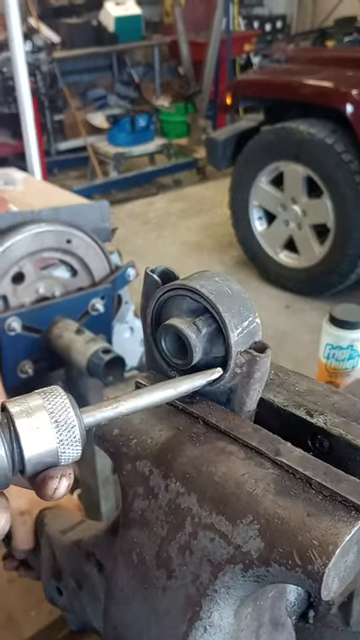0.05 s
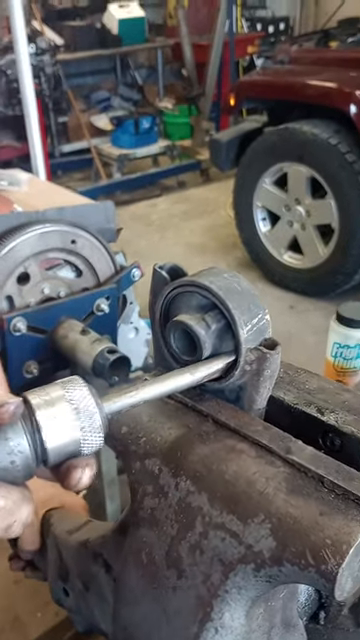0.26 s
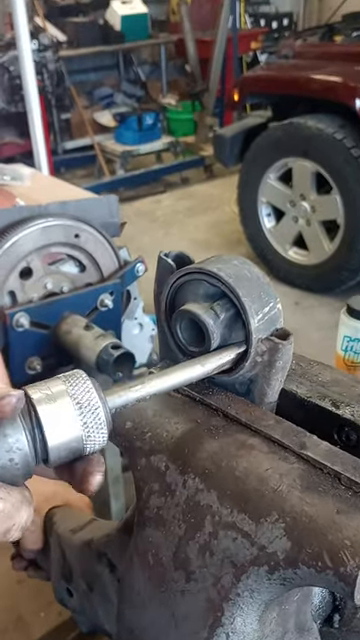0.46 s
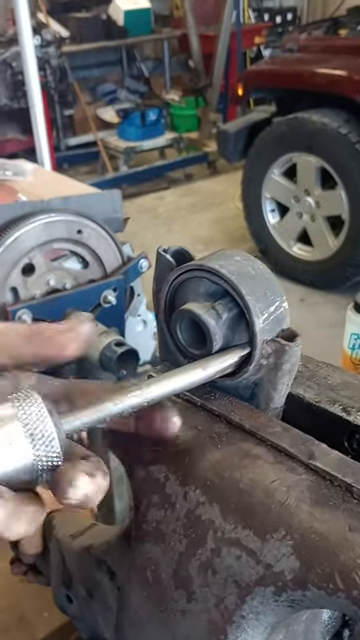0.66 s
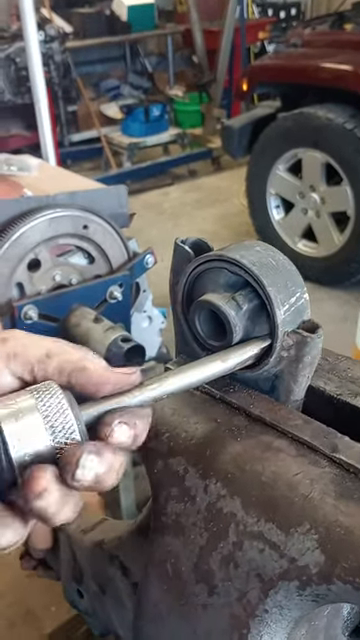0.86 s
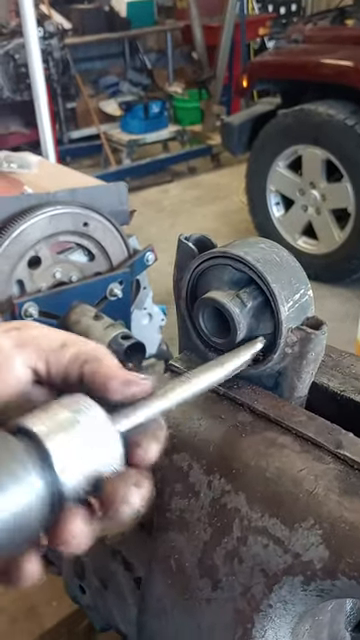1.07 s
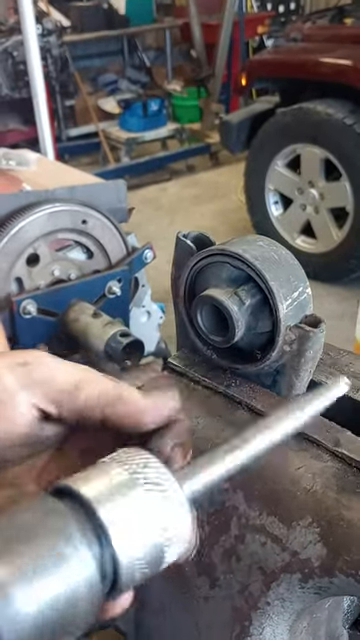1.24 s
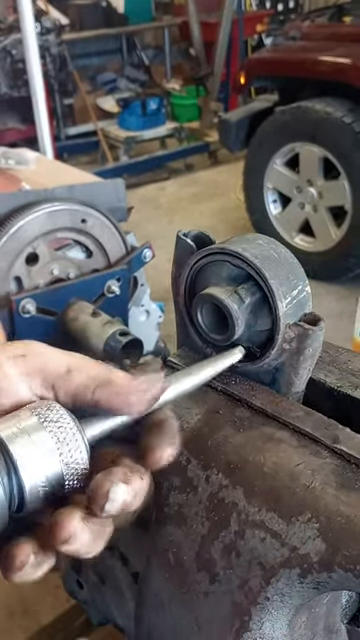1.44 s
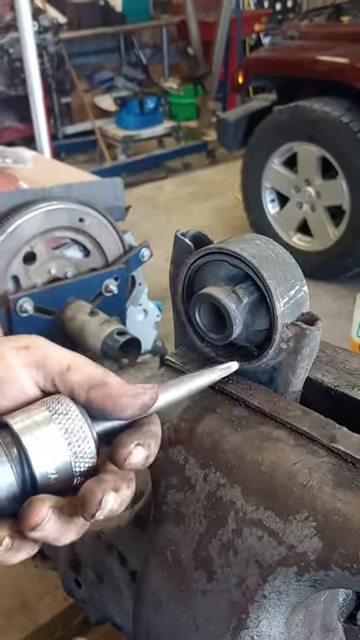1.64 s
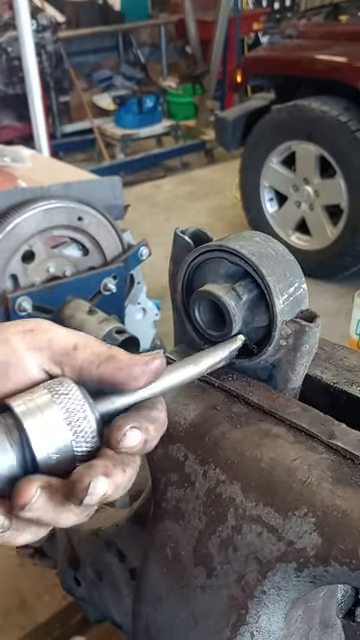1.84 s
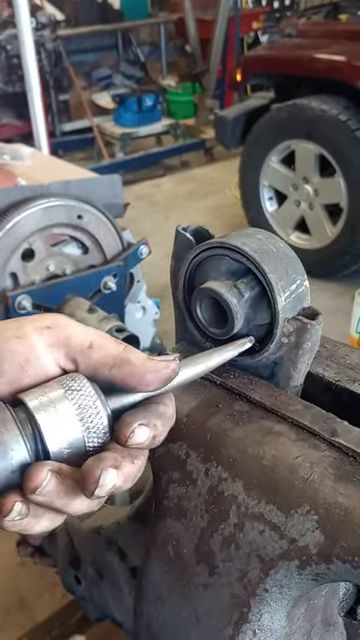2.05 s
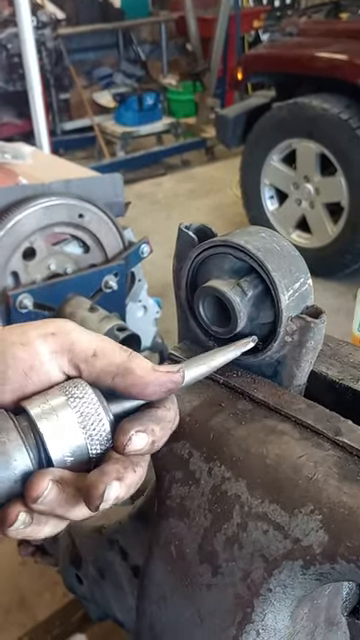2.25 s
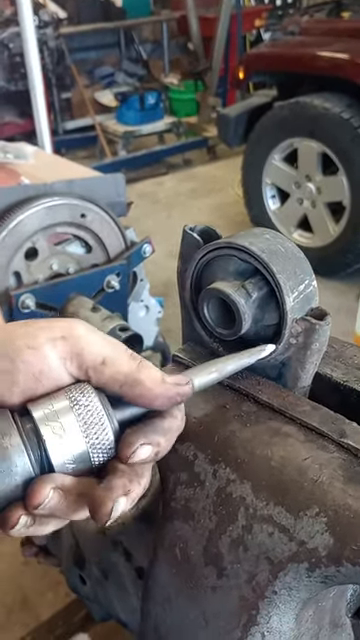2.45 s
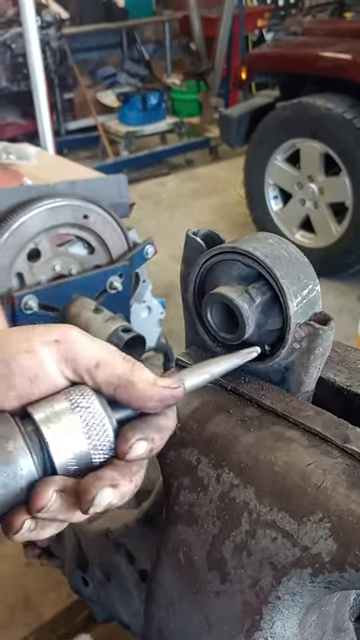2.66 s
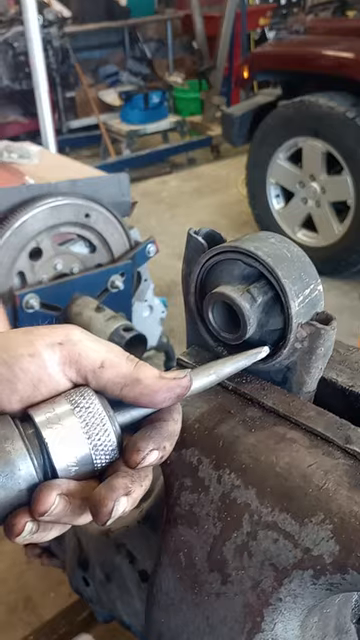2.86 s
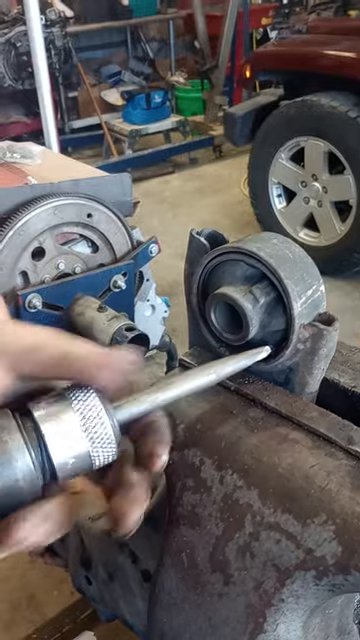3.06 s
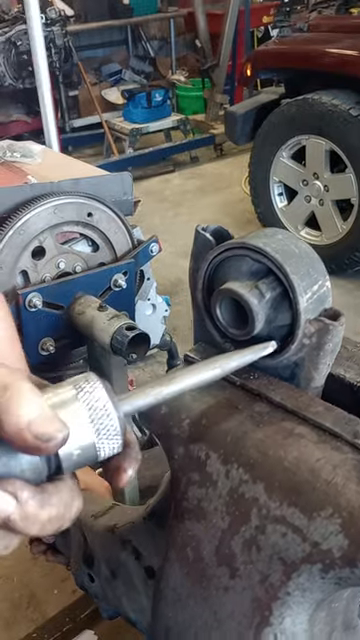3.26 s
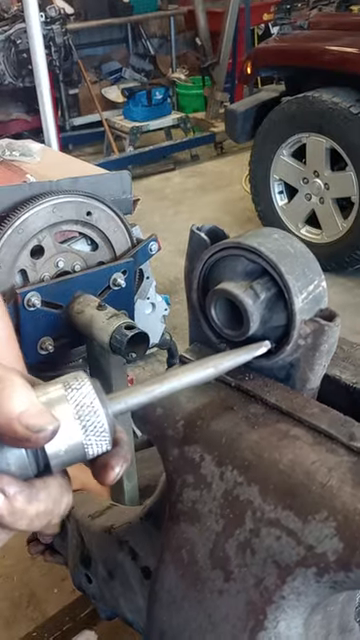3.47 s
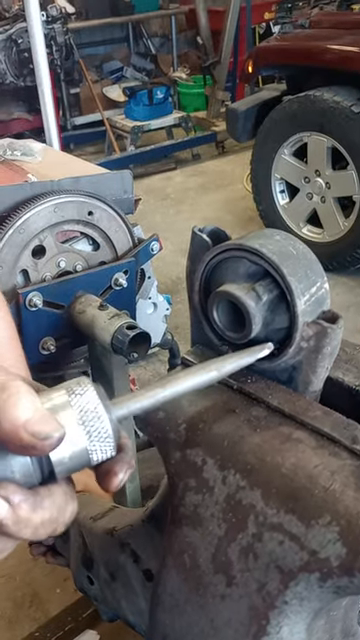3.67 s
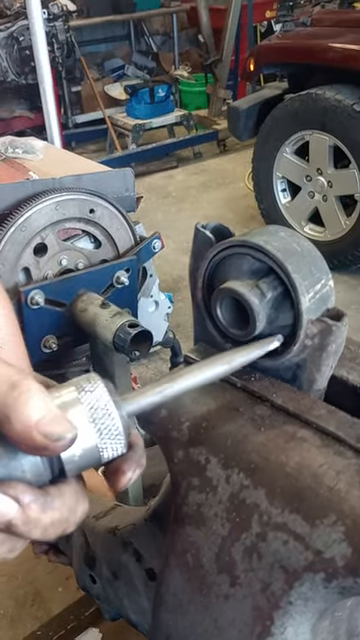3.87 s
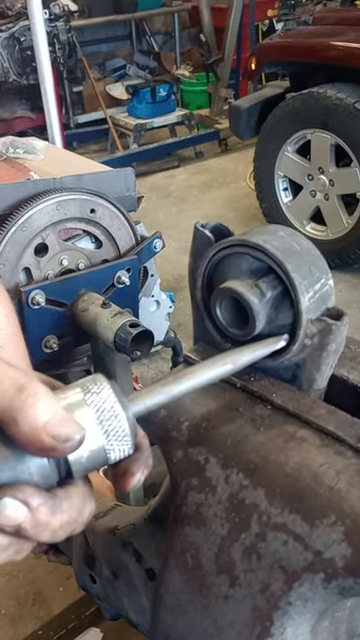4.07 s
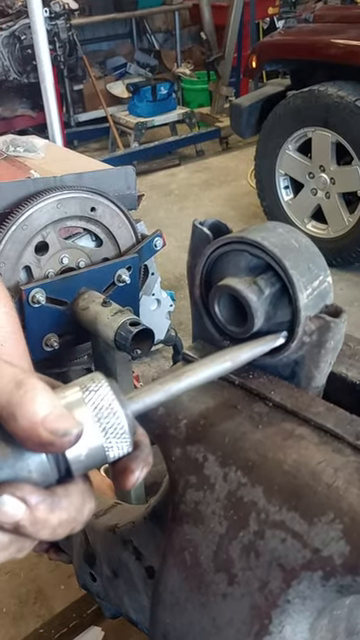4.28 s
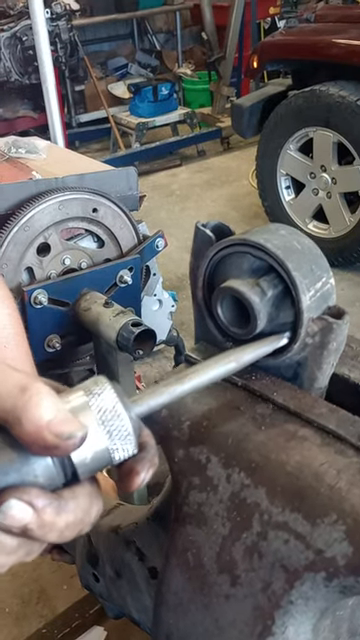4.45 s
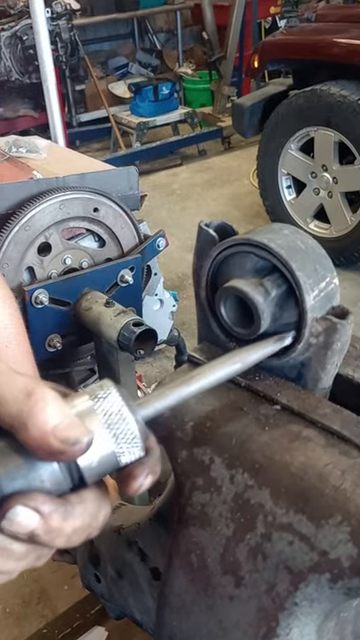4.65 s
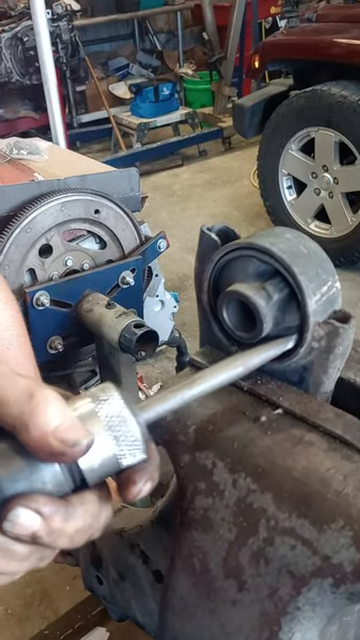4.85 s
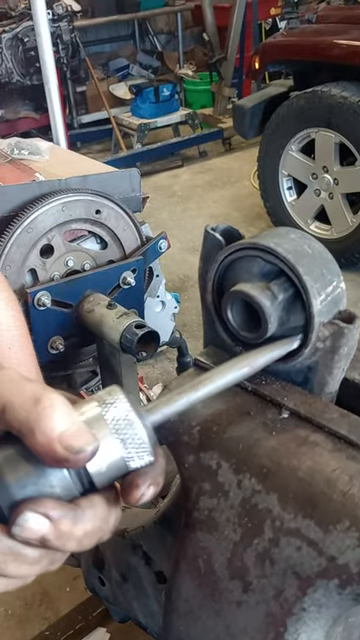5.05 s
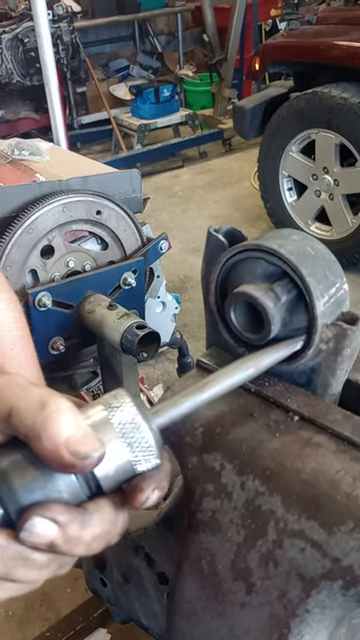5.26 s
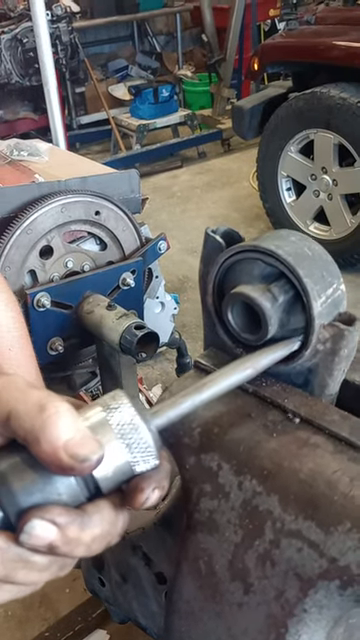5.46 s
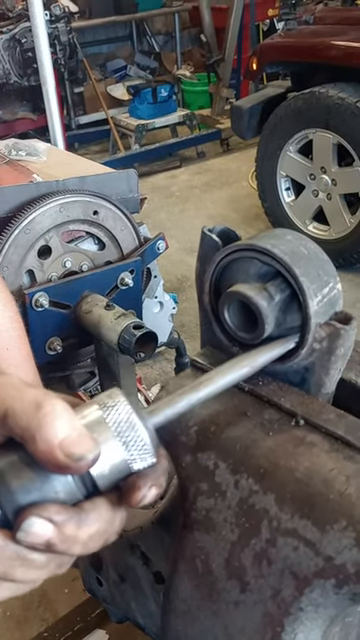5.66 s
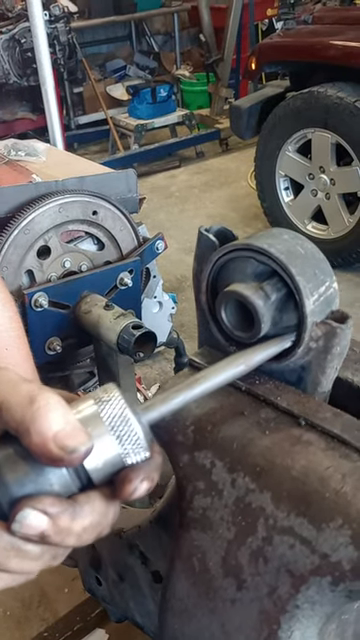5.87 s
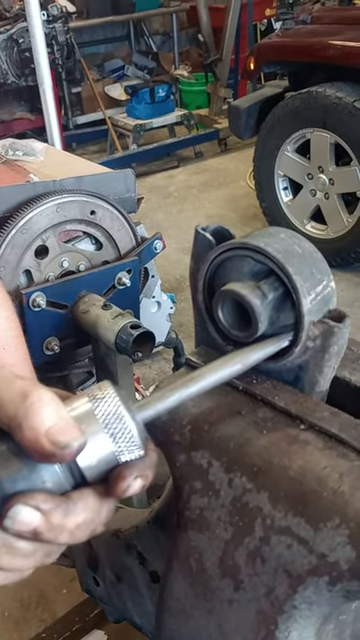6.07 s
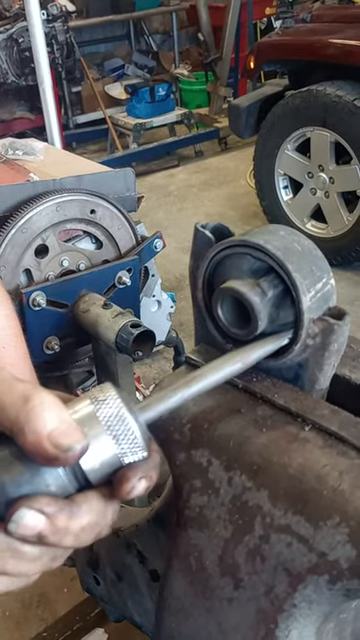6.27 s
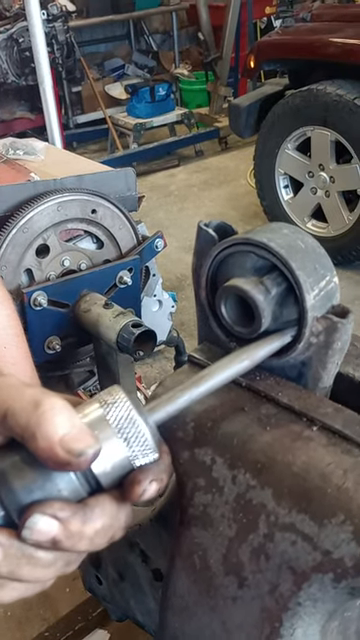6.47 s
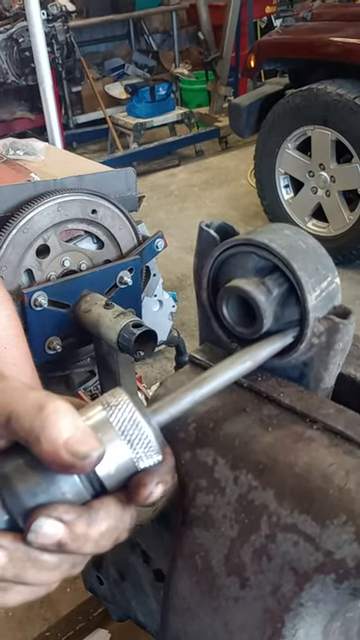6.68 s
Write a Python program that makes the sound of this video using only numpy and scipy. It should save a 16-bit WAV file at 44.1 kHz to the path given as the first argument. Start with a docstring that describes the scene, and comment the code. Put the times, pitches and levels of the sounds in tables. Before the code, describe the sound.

A quiet garage with low mains hum and soft room air, heard close by a small, bass-thin microphone. At about 0.15 s a tiny moan and two idle ticks lead into an air hammer's burst: uneven, loud exhaust pops, crackling rattle and steel clang, ending near 0.5 s in fading hiss and short echoes. From 0.75 to 2.7 s only faint metallic bit clicks break the hum, the clearest near 1.2 s, with a little cluster around 2.5 s. At 3.3 s a soft low knock and fluttering rising moan start; idle pops and ticks follow from 3.55 s, then faltering blows gather into a brief fast run at 3.9 s. After two stray strokes, steady hammering begins at 4.2 s, about forty strokes a second, bright and clanging. From 4.7 s it turns weaker, damped and buzzing, with hiss, swelling low drone and gliding metallic squeals until the end at 6.7 s.

```python
"""Air hammer on a steel sleeve

An air hammer chisels at a steel-sleeved bushing in a vise: a short burst, a pause with the tool clicking
in the hand, then a faltering start and a steady run of about forty strokes a second.
Each stroke is an exhaust pop with rings, plus crackling noise sent through resonances of sleeve and bit.
Shaped noise makes a hiss with a metallic hum under and after the strokes. The wedged bit sings in
gliding resonances, and the garage hums and echoes.
"""
import sys
import numpy as np
from scipy import signal
from scipy.fft import rfft, irfft
from scipy.io import wavfile
from scipy.ndimage import uniform_filter1d

SR = 44100
rng = np.random.default_rng(int(sys.argv[2]) if len(sys.argv) > 2 else 0)


def output_pcm(signal):
    """Save a mono or channel-first signal as 16-bit PCM at the path in sys.argv[1].

    Samples are clipped to [-1, 1] before scaling.
    """
    pcm = np.clip(np.atleast_2d(signal).T, -1, 1) * 32767
    wavfile.write(sys.argv[1], SR, np.round(pcm).astype(np.int16))


N = 296352  # length in samples
T = np.arange(N) / SR  # time in seconds


def gain_of(db):
    """Turns decibels into an amplitude factor."""
    return 10 ** (np.asarray(db) / 20)


def evened(x):
    """Scales a signal to an rms of 1."""
    return x / np.sqrt(np.mean(x ** 2) + 1e-20)


def read(points, hz):
    """Reads a curve of (pitch, value) points, with straight lines over log pitch."""
    point_hz, value = np.transpose(points)
    return np.interp(np.log(hz + 1), np.log(point_hz + 1), value)


def add(mix, start_s, sound):
    """Adds a sound to the mix from a start time, cut at the end of the mix."""
    part = mix[..., round(start_s * SR):][..., :sound.shape[-1]]
    part += sound[..., :part.shape[-1]]


def coloured(x, points, sides=(1, 1)):
    """Applies a dB curve over pitch to both channels, multiplied by each channel's side factor."""
    hz = np.fft.rfftfreq(N, 1 / SR)
    gain = gain_of(np.outer(sides, read(points, hz)))
    return irfft(rfft(x) * gain, N)


def resonate(x, hz, width_hz):
    """A two-pole resonance; white noise of rms 1 stays at rms 1."""
    r = np.exp(-np.pi * width_hz / SR)
    forward = np.sqrt((1 - r ** 2) / 2) * np.array([1, 0, -1])
    feedback = [1, -2 * r * np.cos(2 * np.pi * hz / SR), r ** 2]
    return signal.lfilter(forward, feedback, x)


def glide(x, hz, width_hz):
    """A resonance that follows the pitch curve hz; white noise of rms 1 stays at rms 1."""
    turn = np.exp(2j * np.pi * np.cumsum(hz) / SR)
    r = np.exp(-np.pi * width_hz / SR)
    # shift the pitch down to zero, smooth there, then shift back up
    smooth = signal.lfilter([1], [1, -r], x / turn)
    return np.sqrt(2 * (1 - r ** 2)) * (turn * smooth).real


def ring(hz, t60, rise=0.00021):
    """A struck tone: a sine with a quick rise that fades by 60 dB in t60 seconds."""
    t = np.arange(round(t60 * SR)) / SR
    return np.sin(2 * np.pi * hz * t) * gain_of(-60 * t / t60) * (1 - np.exp(-t / rise))


def noise(same, size=N, late=0):
    """Left and right noise that share a part; the right may get it some samples late."""
    a, b = rng.standard_normal((2, size))
    right = same * np.roll(a, late) + np.sqrt(1 - np.clip(same, 0, 1) ** 2) * b
    return np.array([a, right])


# Hum tones: pitch_hz, level_db (the first, steady tone gets 4 dB more)
HUM_TONES = [(118.4, -62), (220.7, -61), (242.2, -63), (382.2, -69.5)]
# Tone colour of the room air: pitch_hz, relative_level_db
AIR_COLOUR = [(24, -55), (40, -21), (106, -3.5), (171, -10), (237, -22), (290, -7.5), (715, -7),
              (1090, -8.5), (1720, -5.5), (5870, -18), (8130, -30), (14800, -30), (16000, -25)]
# How alike left and right are in the room air: pitch_hz, likeness (-1 to 1)
AIR_LIKENESS = [(60, 0.94), (130, 0.65), (290, 0.4), (640, 0.18), (1410, 0.038), (3100, -0.27),
                (6820, 0.25), (15000, -0.19)]


def background():
    """Room noise with slight random patches of level, and a mains hum of one steady and wavering tones."""
    frames, hz = N // 256 + 5, np.fft.rfftfreq(1024, 1 / SR)
    a, b, c, d, patches = rng.standard_normal((frames, 513, 5)).T
    patches = evened(uniform_filter1d(uniform_filter1d(patches, 12, 0), 14, 1))
    same = np.clip(read(AIR_LIKENESS, hz), -1, 1)[:, None]
    left = a + 1j * b
    right = same * left + np.sqrt(1 - same ** 2) * (c + 1j * d)
    level_db = read(AIR_COLOUR, hz)[:, None] + 1.66 * patches
    spectrum = np.array([left, right]) * gain_of(level_db)
    air = signal.istft(spectrum, nperseg=1024, noverlap=768)[1][:, :N]
    air = gain_of(-49.5) * evened(air)
    # narrow resonances in noise give the wavering tones
    wavering = sum(gain_of(db) * resonate(noise(0.99), pitch_hz, 7.0) for pitch_hz, db in HUM_TONES[1:])
    steady_hz, steady_db = HUM_TONES[0]
    steady = gain_of(steady_db + 4) * np.sin(2 * np.pi * steady_hz * T)
    return air + wavering + steady


# Moans as the trigger eases open: start_s, length_s, from_hz, to_hz, level_db (before the flutter)
MOANS = [(0.125, 0.019, 335, 330, -40), (3.319, .24, 205.4, 347, -51)]


def trigger_moan():
    """A low moan as the trigger eases open: a fluttering sine glides in pitch."""
    out = np.zeros((2, N))
    for start_s, length_s, from_hz, to_hz, db in MOANS:
        size = round(length_s * SR)
        flutter = 0.66 + .5 * evened(uniform_filter1d(rng.standard_normal(N), 700))[:size]
        tone = np.sin(2 * np.pi * np.cumsum(np.linspace(from_hz, to_hz, size)) / SR)
        add(out, start_s, gain_of(db) * signal.windows.tukey(size, .3) * flutter * tone)
    return out


# Piston swings that miss the bit, forward into the barrel and back in turn:
# start_s, pop_db, ring_db, rattle_db
IDLE_SWINGS = [(0.1595, -9, -6.5, -17), (0.1822, -8, -11.5, -12), (3.5439, -20, -7, -32),
               (3.578, -5.5, -14, -28), (3.6081, -1.5, -4, -15), (3.641, -12, -11, -21.5),
               (3.6725, 3, -4.5, -14), (3.6987, -22, -18, -34)]
# Faltering blows: start_s, pop_db, blow_after_pop_ms, clang_db, rattle_db
FALTERING_BLOWS = [(.2081, -1, -4, -22, -11.5), (.2222, -17, -14.5, -17.5, -31), (.2425, 1, 2.5, -5, -13),
                   (.2709, 1, 6.5, -12, -10), (.2967, -1, 7, -18, -9), (.4328, 0, -3.5, -25, -7.5),
                   (.4886, -11, 0.5, -20, -14), (3.6803, -23, -4, -13, -26), (3.7245, 2, -3, -13, -13),
                   (3.7694, 0, -5, -10, -12.5), (3.8056, 0, -0.5, -8.5, -10),
                   (3.8415, -0.5, -1.5, -7.5, -11), (3.8693, -0.5, 4.5, -8.5, -7.5),
                   (4.1192, -7.5, 0, -7.5, -15), (4.1918, 0.5, -1, -8.5, -13.5)]
# Even runs, each a list of: time_s, strokes_done
EVEN_RUNS = [
    [(.3247, 0), (.4005, 3)],
    [(3.8985, 0), (4.071, 7)],
    [(4.219, 0), (4.518, 12), (5.2805, 42), (5.7344, 60), (6.4865, 90), (6.7099, 99)],
]
# Force in the even runs, before random variation:
# time_s, pop_db, blow_after_pop_ms, clang_db, rattle_db
EVEN_FORCE = [(.32, 3, 2.5, -8.5, -11.5), (0.412, 2.5, -9, -24.5, -10), (3.9, 2.5, 5.5, -8.5, -12),
              (4.08, 2, 1, -8, -10.5), (4.22, 2.5, -0.4, -7.5, -10.5), (4.6, 3, 2.5, -14, -9),
              (4.69, -1, -1.2, -20.5, -17), (5.16, -4, 2, -20, -13), (5.6, -2.5, -0.1, -18, -14),
              (6.4, -3, 1.7, -19.5, -15), (6.72, -6, 1.5, -22.5, -17)]
# Swelling of the bench drone: time_s, lowest_level_db
DRONE_SWELL = [(5.2, -45), (5.35, -32), (5.49, -40), (5.56, -25), (5.97, -24), (6.08, -55), (6.34, -27),
               (6.46, -49)]
STROKE_COLUMNS = ("start_s", "pop_db", "barrel_db", "thump_db", "blow_ms",
                  "clang_db", "rattle_db", "ping_db", "drone_db")


def plan_strokes():
    """Lists the time and part levels of every stroke; force drives the air and the steel together."""
    bench_db, early_ping_db = -52.5, -15  # drone under the pop, ping under the rattle
    starts = []
    for run in EVEN_RUNS:
        time_s, done = np.transpose(run)
        starts.append(np.interp(np.arange(run[-1][1] + 1), done, time_s))
    starts = np.concatenate(starts)
    force_s, *force = np.transpose(EVEN_FORCE)
    even = np.transpose([starts] + [np.interp(starts, force_s, column) for column in force])
    # no two strokes alike: s, dB, ms, dB, dB
    even += rng.standard_normal(even.shape) * [.0001, .8, .6, 1.3, .7]
    start, pop, blow, clang, rattle = np.vstack([FALTERING_BLOWS, even]).T
    is_even = np.arange(len(start)) >= len(FALTERING_BLOWS)
    chance = rng.standard_normal((len(start), 3))
    barrel = pop + np.where(is_even, -31, -11.5) + 1.4 * chance[:, 0]
    thump = pop + np.where(is_even, -28.5, -18.5) + 2.0 * chance[:, 1]
    # the shank pings harder from 3.5 to 6 s
    ping = rattle + np.interp(start, [3.5, 6], [early_ping_db, -1.5]) + 1.5 * chance[:, 2]
    drone = np.maximum(pop + bench_db, np.interp(start, *np.transpose(DRONE_SWELL), -99, -99))
    rows = []
    for k, (at, air, ring_db, shake) in enumerate(IDLE_SWINGS):
        backward = k % 2  # forward favours the barrel ring, backward the thump
        rows.append((at, air, ring_db - 40 * backward, ring_db - 40 * (1 - backward),
                     -2, -45, shake, shake + early_ping_db, air + bench_db))
    blows = np.transpose([start, pop, barrel, thump, blow, clang, rattle, ping, drone])
    return dict(zip(STROKE_COLUMNS, np.vstack([rows, blows]).T))


def shaking(strokes, level, rise, t60):
    """Amplitude curve of the shaking after each blow; where the clang is weak it dies much sooner."""
    power = np.zeros(N)
    t = np.arange(round(.3 * SR)) / SR
    for start, blow_ms, clang, db in zip(strokes["start_s"], strokes["blow_ms"],
                                         strokes["clang_db"], strokes[level]):
        weight = np.interp(clang, [-26, -21], [.13, 1])
        # squared amplitudes, so that overlapping blows add as power
        shape = (1 - np.exp(-t / rise)) ** 2 * gain_of(-120 * t / (t60 * weight))
        add(power, start + blow_ms / 1000, gain_of(2 * db) * shape / shape.max())
    return np.sqrt(power)


def exhaust(strokes):
    """A pressure pop and its bounce, the rings of barrel, vise and bench, and a gusty rumble."""
    left, right = ring(680, 0.0025, .0001), ring(497, 0.0057, 0.00034)
    left = np.pad(left, (0, len(right) - len(left)))
    pop = np.array([1.12 * left, 1.275 * right])  # fuller on the right
    out = np.zeros((2, N))
    names = ("start_s", "pop_db", "barrel_db", "thump_db", "drone_db")
    for start, pop_db, barrel_db, thump_db, drone_db in zip(*(strokes[name] for name in names)):
        bounce_shift, pitch_shift = rng.standard_normal(2)
        add(out, start, gain_of(pop_db) * pop)
        add(out, start + 0.00733, gain_of(pop_db - 12.0 + 0.99 * bounce_shift) * pop)
        add(out, start - .002, gain_of(barrel_db) * ring(741, 0.044, 0.0059))
        add(out, start, gain_of(thump_db) * ring(320 * (1 + .02 * pitch_shift), .055, .0008))
        add(out, start, gain_of(pop_db - 29.5) * ring(541.0, 0.23, 0.0003))
        add(out, start, gain_of(drone_db) * ring(159.2, 0.12, 0.0014))
    gust = shaking(strokes, "pop_db", rise=0.0094, t60=0.13)
    rush = gain_of(-28.5) * resonate(gust * noise(.5), 350, 470)
    rumble = gain_of(-26.5) * resonate(gust * noise(0.063), 67, 38)
    return out + rush + rumble


# Rings of the idle piston: pitch_hz (varied each time), level_under_rattle_db, fade_by_60db_s
PISTON_RINGS = [(2160, -12, 0.033), (2850, -23, 0.065), (4300, -24, .015), (6630, -1.5, 0.0117)]


def piston():
    """With the bit untouched, each idle swing leaves a sharp tick of short piston rings."""
    out = np.zeros((2, N))
    for start_s, _, _, rattle_db in IDLE_SWINGS:
        for hz, db, t60 in PISTON_RINGS:
            tone = ring(hz * rng.uniform(0.86, 1.02), t60)
            add(out, start_s, gain_of(rattle_db + db) * tone)
    return out


def crackling():
    """The bouncing bit's crackle: a fast random swing in loudness, at rms 1."""
    swing = evened(uniform_filter1d(rng.standard_normal(N), 40))
    return evened(gain_of(1.06 * swing))


# Resonances of the steel sleeve: pitch_hz, width_hz, relative_level_db
SLEEVE_MODES = [(1268, 25, -3), (1797, 25, 1), (1990, 45, 1), (2082, 30, 0), (2200, 60, -5), (2433, 28, -3),
                (2750, 120, -9)]


def sleeve_clang(strokes, crackle):
    """Crackling blows ring the sleeve, damped once the chisel wedges in, and thud in the rubber."""
    clang = shaking(strokes, "clang_db", rise=0.00025, t60=0.089) * crackle * noise(0.31, late=6)
    damped = clang * gain_of(np.interp(T, [4.66, 4.7], [0, -6]))
    sleeve = sum(gain_of(db - 13.5) * resonate(damped, hz, width) for hz, width, db in SLEEVE_MODES)
    return sleeve + gain_of(-11.5) * resonate(clang, 1370, 2100)  # dull clunk of the rubber


# Broad tone colour of the rattle, also used for the hiss: pitch_hz, relative_level_db
RATTLE_COLOUR = [(530, -24), (900, -23), (1850, -2), (2860, -3), (3820, 2.5), (5350, 2.5), (6330, 3.5),
                 (7400, 3), (8350, -4.5), (10400, -0.5), (13400, -3.5), (15100, 4.5), (16000, -8.5)]
# Resonances of the bit, also used for the hiss: pitch_hz, width_hz, relative_level_db
BIT_MODES = [(3885, 74, -18), (4100, 350, -17.5), (5880, 22, -23), (6350, 110, -16), (6630, 210, -24),
             (7340, 18, -15)]


def chattering(strokes):
    """Amplitude curve of the bit's chatter after the blows."""
    return shaking(strokes, "rattle_db", rise=0.0015, t60=0.14)


def bit_rattle(strokes, crackle):
    """The bouncing bit gives a broad rattle and drives its own resonances."""
    buzz = chattering(strokes) * crackle * noise(0.3, late=2)
    body = coloured(buzz, RATTLE_COLOUR)
    body = body * np.std(buzz) / np.std(body) * gain_of(-5.5)
    return body + sum(gain_of(db - 10) * resonate(buzz, hz, width) for hz, width, db in BIT_MODES)


def shank_ping(strokes, crackle):
    """Each blow makes the shank ping high up; the piston's rebound jolts it again."""
    jolt = shaking(strokes, "ping_db", rise=0.001, t60=0.16)
    rebound = np.pad(jolt, (370, 0))[:N]  # 370 samples later
    jolt = np.hypot(jolt, rebound)
    return gain_of(-5.5) * resonate(jolt * crackle * noise(0.25, late=2), 15660, 180)


# Steady hiss under and after the strokes: time_s, level_db (the treble falls further)
HISS_LEVEL = [(.2, -50), (.25, -25), (.48, -27), (.56, -24), (.642, -39.5), (.75, -70), (3.66, -68),
              (3.8, -45), (3.95, -19), (4.1, -29), (4.22, -24), (4.62, -25), (4.7, -36), (5.5, -31),
              (6.72, -30)]


def metallic_hiss():
    """Steady hiss with metallic hum under and after the strokes; as it weakens the treble goes first."""
    time_s, level_db = np.transpose(HISS_LEVEL)
    db = np.interp(T, time_s, level_db, -99, -99)
    source = noise(0.05, late=1)
    hiss = evened(coloured(source, RATTLE_COLOUR))
    hiss += gain_of(-5.5) * sum(gain_of(d) * resonate(source, hz, width) for hz, width, d in BIT_MODES)
    hiss += gain_of(-24.0) * resonate(source, 2050, 285)  # at a sleeve pitch
    hiss += gain_of(-18) * resonate(source, 350, 380)  # low body
    low = signal.sosfilt(signal.butter(4, 7800, fs=SR, output="sos"), hiss)
    treble_gain = gain_of(2.8 * np.minimum(db + 23.5, 0))
    return gain_of(db) * (low + treble_gain * (hiss - low))


# Loose bit clicks: start_s, relative_level_db, brightest_hz, fade_by_60db_s, left_minus_right_db
BIT_CLICKS = [(.7577, -39, 2480, 0.081, -2), (1.113, -45.5, 4100, 0.11, -2), (1.2054, -29.5, 4650, 0.1, 0),
              (1.969, -48, 5000, 0.11, -1), (2.4666, -43.5, 3380, 0.045, -13),
              (2.4785, -44, 3420, 0.055, -1), (2.487, -46, 6700, 0.048, 8), (2.509, -41, 1900, 0.085, -8),
              (2.6565, -34.5, 3370, .05, 2), (2.6674, -38.5, 1160, 0.24, -7)]
# Resonances of the bit holder: pitch_hz, width_hz, relative_level_db
HOLDER_MODES = [(2200, 230, -10), (3100, 140, -30), (3380, 150, -10), (4170, 280, -17.5), (4800, 240, -11),
                (5460, 160, -2), (6820, 290, -2), (7370, 340, -9), (9170, 400, -2), (12500, 500, -12),
                (14200, 700, -19)]


def holder_clicks():
    """The loose bit clicks: short noise bursts ring the holder near each click's own pitch."""
    out, t = np.zeros((2, N)), np.arange(round(.2 * SR)) / SR
    for start_s, db, bright_hz, t60, pan_db in BIT_CLICKS:
        snap = gain_of(6 - 60 * t / 0.011)  # a short snap opens each click
        fade = gain_of(-60 * t / t60) + snap
        # dB lost per octave away from the brightest pitch: light clicks stay close to it
        focus_db = np.interp(db, [-42, -31.5], [12, -0.5])
        burst = noise(.3, size=len(t)) * fade * (1 - np.exp(-t / .001))
        click = 0
        for hz, width, mode_db in HOLDER_MODES + [(bright_hz, 400, -2)]:
            mode_gain = gain_of(mode_db - focus_db * abs(np.log2(hz / bright_hz)))
            softened = resonate(burst, hz, 4 * width) / 4
            click = click + mode_gain * resonate(softened, hz, width)
        side_db = np.array([[pan_db / 2], [-pan_db / 2]])
        add(out, start_s, gain_of(db + side_db) * click)
    return out


def hand_knock():
    """A soft knock of the hand: one low tone that rises and fades."""
    out = np.zeros((2, N))
    add(out, 3.335, gain_of(-28.5) * ring(81, 0.16, 0.012))
    return out


# The wedged bit sings for a while: start_s, length_s, from_hz, to_hz, relative_level_db
SINGING_NOTES = [(4.635, 0.28, 6090, 6150, -26), (4.892, 0.3, 6230, 6270, -25),
                 (4.84, 0.33, 3700, 3890, -35.5), (4.93, 0.64, 1250, 1323, -35.5),
                 (5.244, 0.45, 2170, 2164, -33.5), (5.332, 0.34, 3240, 3230, -33),
                 (5.37, 0.53, 6680, 6600, -27), (5.663, 0.176, 3320, 3260, -29.5),
                 (5.812, 0.23, 3910, 3900, -26.5), (6.045, 0.69, 3860, 3970, -33),
                 (6.023, 0.59, 4270, 4170, -26), (6.285, 0.27, 1850, 1830, -35),
                 (6.304, 0.41, 5080, 5140, -32.5), (6.475, 0.33, 1990, 2000, -28),
                 (6.51, 0.32, 2180, 2100, -30), (6.561, 0.08, 3310, 3490, -35),
                 (6.603, .2, 1880, 1840, -25.5), (4.9, 0.58, 10400, 10300, -32),
                 (5.696, 1.09, 11700, 11300, -29)]
# How wide the singing resonance is: pitch_hz, width_hz
SINGING_WIDTH = [(1300, 43), (6200, 70), (6500, 260), (10000, 900)]


def singing_bit(strokes):
    """The wedged bit sings: noise throbbing with the strokes drives gliding, wavering resonances."""
    out = np.zeros((2, N))
    chatter = chattering(strokes)
    throb = chatter / (uniform_filter1d(chatter, 2200) + 1e-9)  # keeps the beat, evens the level
    for start_s, length_s, from_hz, to_hz, db in SINGING_NOTES:
        pulse = throb[round(start_s * SR):][:round(length_s * SR)]
        drive = pulse * noise(0.41, size=len(pulse), late=1)
        waver = evened(uniform_filter1d(rng.standard_normal(len(pulse)), size=3000))
        hz = np.linspace(from_hz, to_hz, len(waver)) * (1 + 0.0025 * waver)
        note = glide(drive, hz, read(SINGING_WIDTH, from_hz))
        add(out, start_s, gain_of(db) * signal.windows.tukey(len(hz), .4) * note)
    return out


def patchy(x, patchy_db):
    """Random hollows and bright spots a few hundred Hz wide that last some 100 ms."""
    z = signal.stft(x, nperseg=512, noverlap=384)[2]
    field = rng.standard_normal(z.shape[:0:-1])  # time by pitch, shared by both channels
    field = uniform_filter1d(uniform_filter1d(field, size=40, axis=0), size=3, axis=1)
    gain = gain_of(patchy_db * evened(field).T)
    return signal.istft(z * gain, nperseg=512, noverlap=384)[1][:, :N]


# How the metal leans to one side: pitch_hz, left_minus_right_db
METAL_LEAN = [(1290, -0.5), (2380, -0.5), (4400, -3), (7000, -2.5), (9000, 6), (12000, 3.5), (15000, -1.5)]


def metal_sounds(strokes):
    """Joins the steel, the metallic hiss and the piston, leaning left or right by pitch."""
    crackle = crackling()
    steel = sleeve_clang(strokes, crackle) + bit_rattle(strokes, crackle)
    steel += shank_ping(strokes, crackle) + singing_bit(strokes)
    metal = patchy(steel + metallic_hiss(), patchy_db=2.5) + piston()
    return coloured(metal, METAL_LEAN, sides=(.5, -.5))


# How long the garage echoes: pitch_hz, fade_by_60db_s
GARAGE_FADE = [(100, 0.2), (500, 0.3), (2000, 0.36), (6000, 0.45), (14000, 0.21)]


def garage(x):
    """Echoes: sparse taps of random sign, different left and right, each band dying at its own speed."""
    taps = np.zeros((2, SR // 2))
    # one tap in every 20 samples, at a random place
    at = np.arange(300, SR // 2 - 20, 20) + rng.integers(0, 20, (2, (SR // 2 - 301) // 20))
    np.put_along_axis(taps, at, rng.choice([-1., 1.], at.shape), 1)
    hz, t, z = signal.stft(taps, SR, nperseg=256)
    fade = gain_of(-60 * t / read(GARAGE_FADE, hz)[:, None])
    tail = signal.istft(z * fade, SR, nperseg=256)[1]
    return signal.fftconvolve(x, tail / np.linalg.norm(tail[0]), axes=1)[:, :N]


def scene():
    """Mixes the direct sounds, their garage echoes and the background."""
    strokes = plan_strokes()
    hand = trigger_moan() + holder_clicks() + hand_knock()
    air = exhaust(strokes)
    metal = metal_sounds(strokes)
    echoes = garage(gain_of(-7.5) * air + gain_of(-8) * metal + gain_of(-29.5) * hand)
    return air + metal + hand + echoes + background()


def record(dry):
    """The small microphone drops the deepest bass; soft overload at the peaks, then the band limit."""
    thin = signal.sosfilt(signal.butter(2, 130, "high", fs=SR, output="sos"), dry)
    bent = np.clip(np.tanh(thin / 1.22) * 1.388, -1, 1)
    band_limit = signal.firwin(511, 15900, window=("kaiser", 7), fs=SR)  # cutoff in Hz
    return signal.oaconvolve(bent, band_limit[None], "same")


dry = scene()
out = record(dry)
output_pcm(out)
```